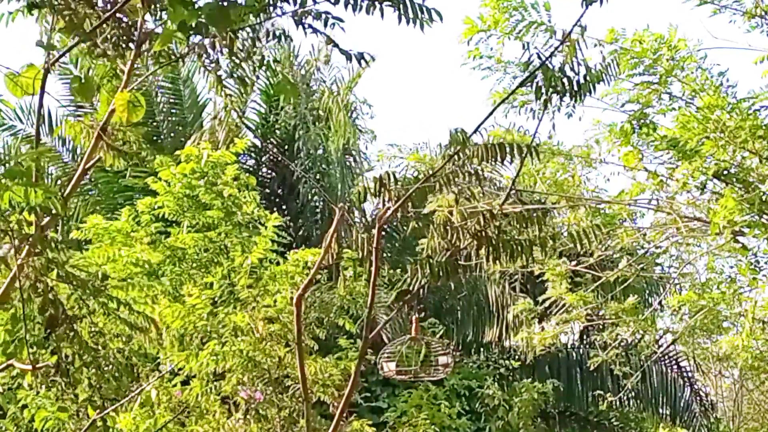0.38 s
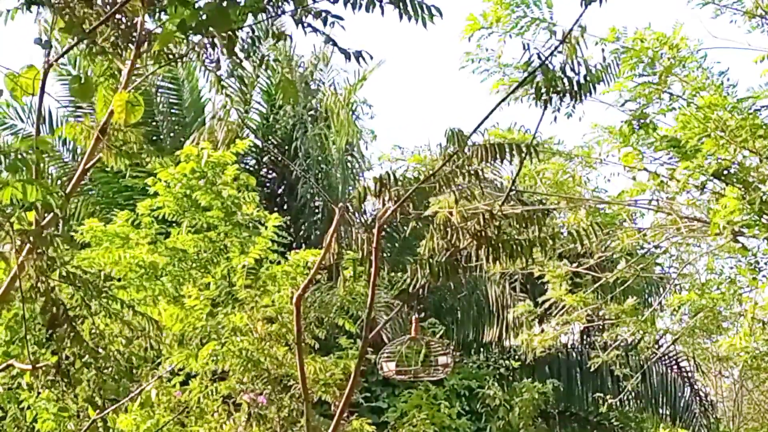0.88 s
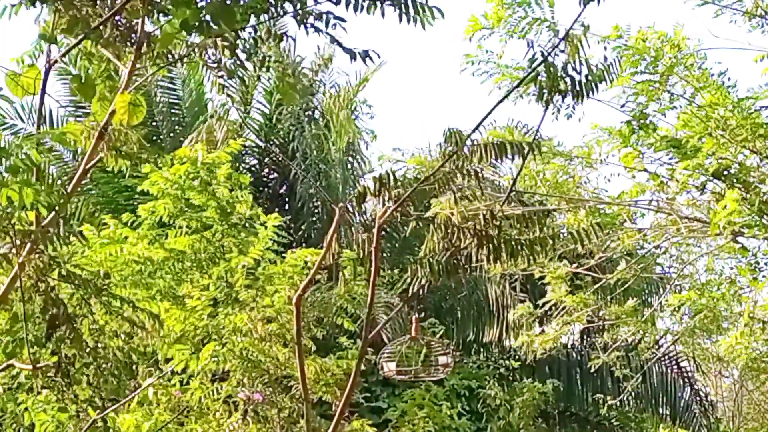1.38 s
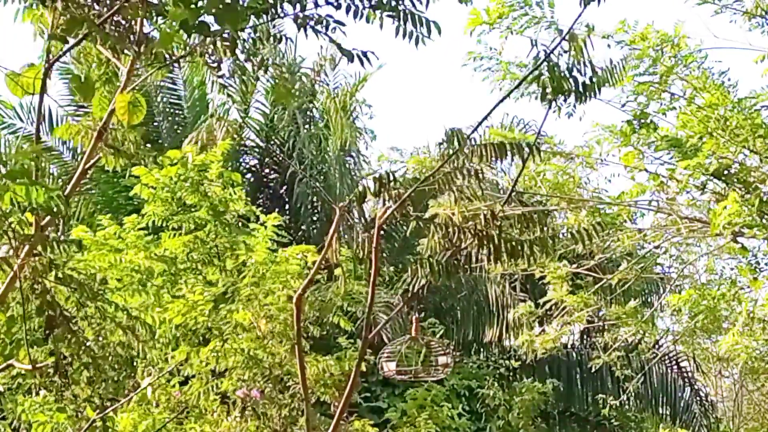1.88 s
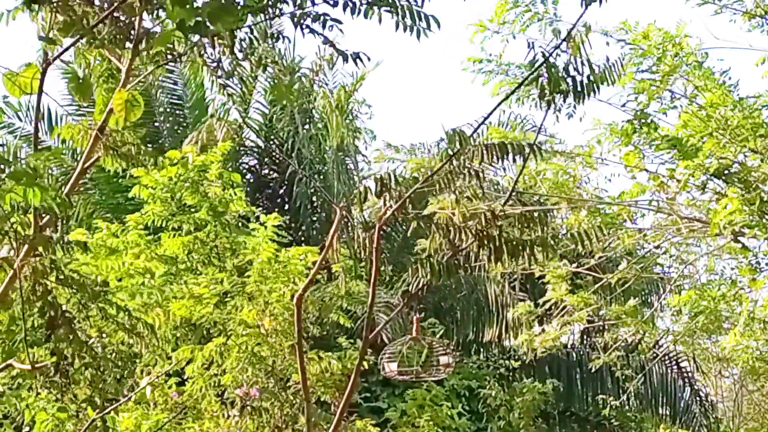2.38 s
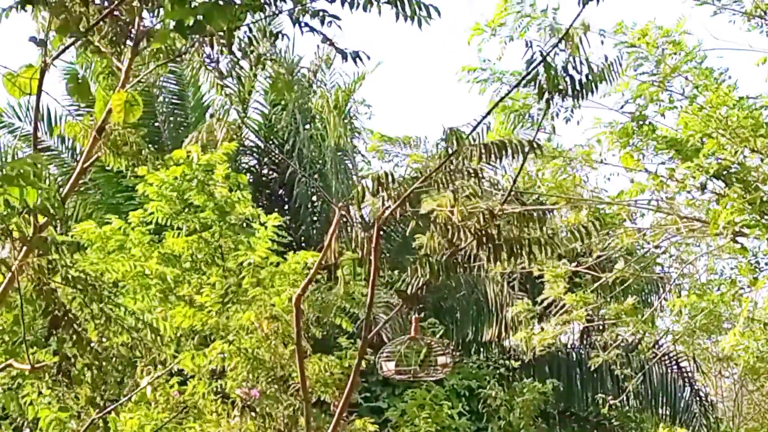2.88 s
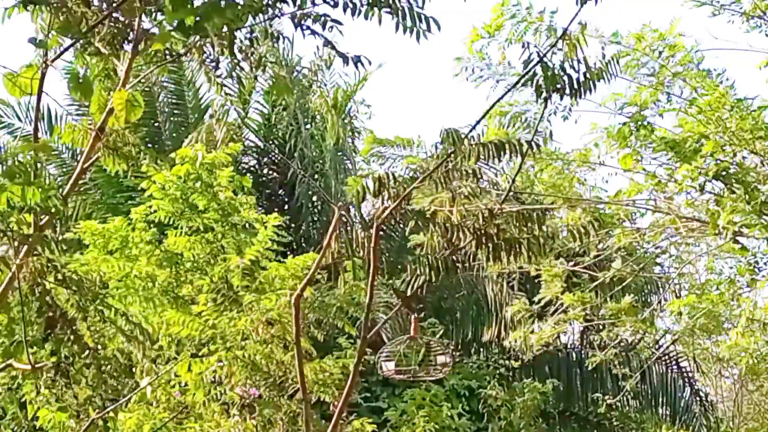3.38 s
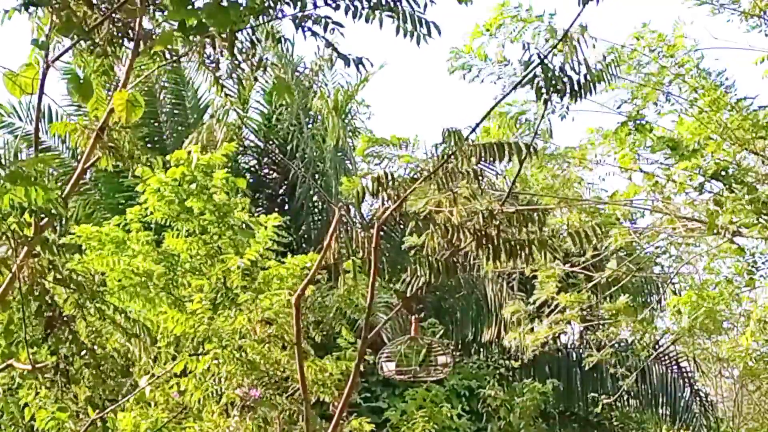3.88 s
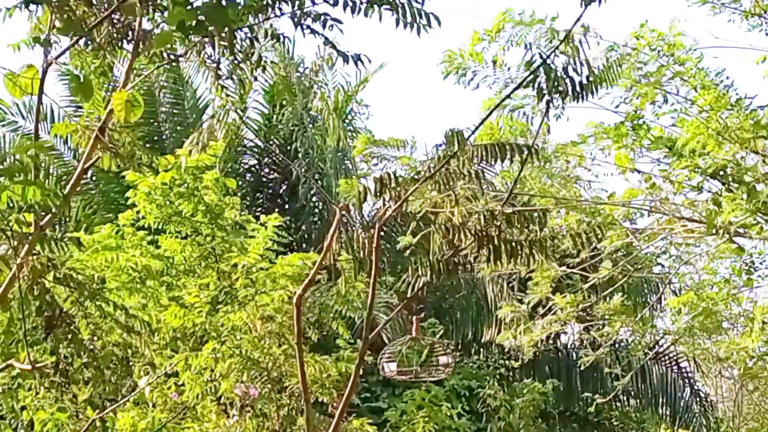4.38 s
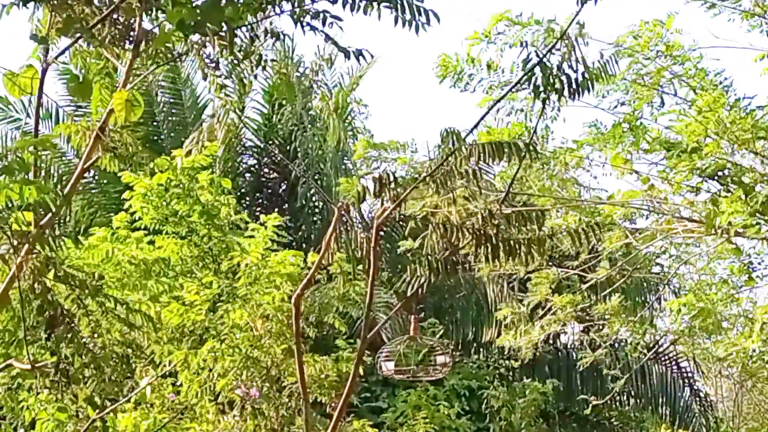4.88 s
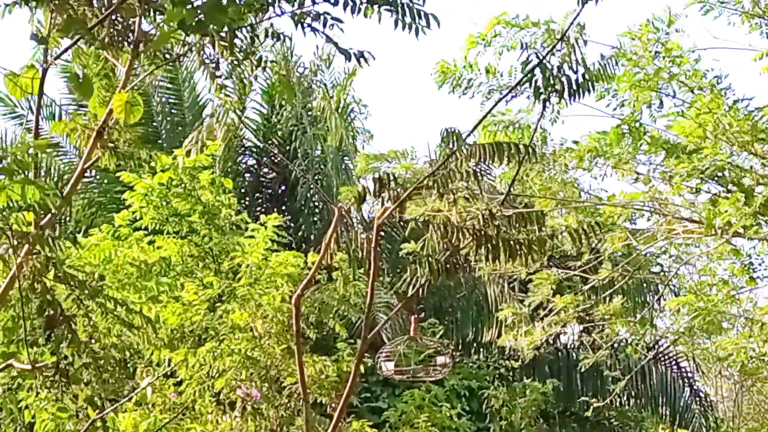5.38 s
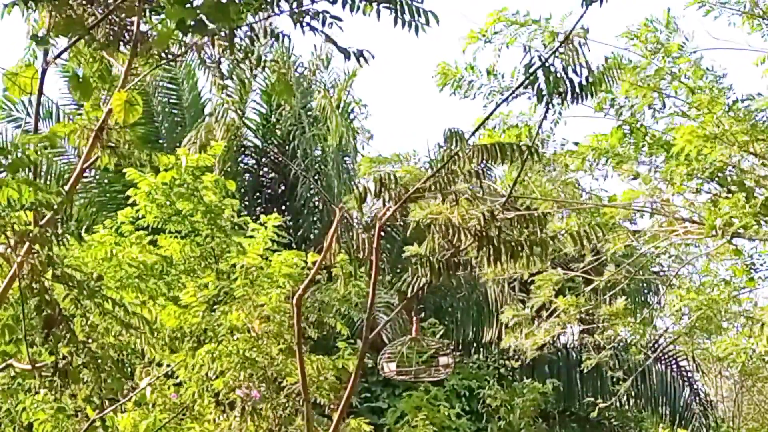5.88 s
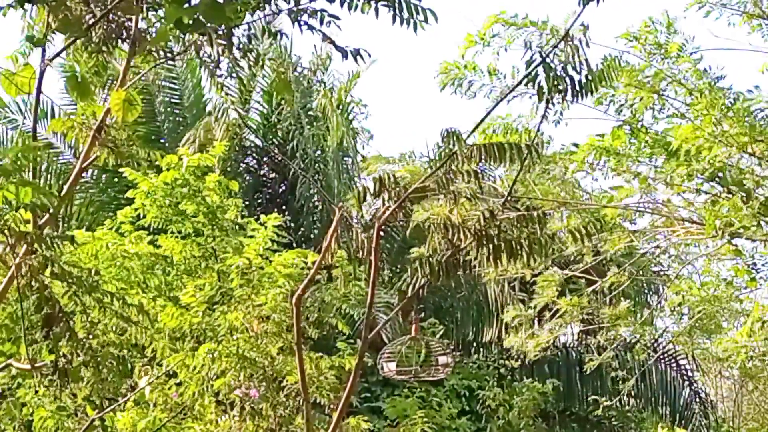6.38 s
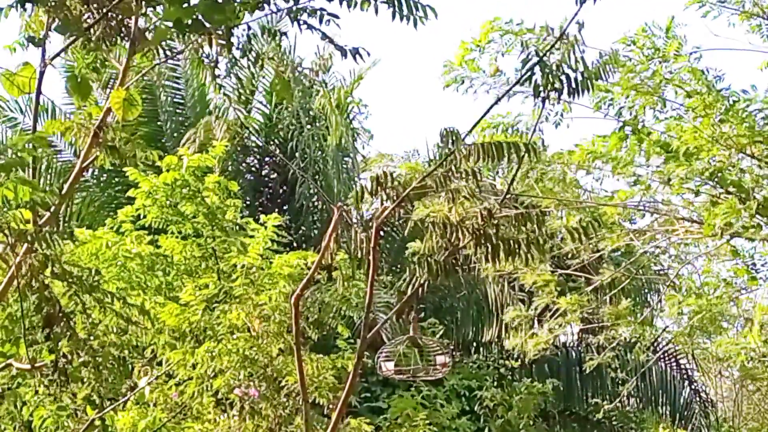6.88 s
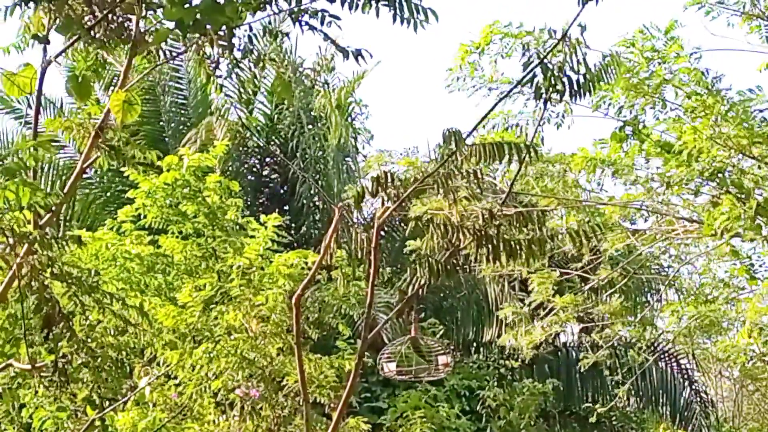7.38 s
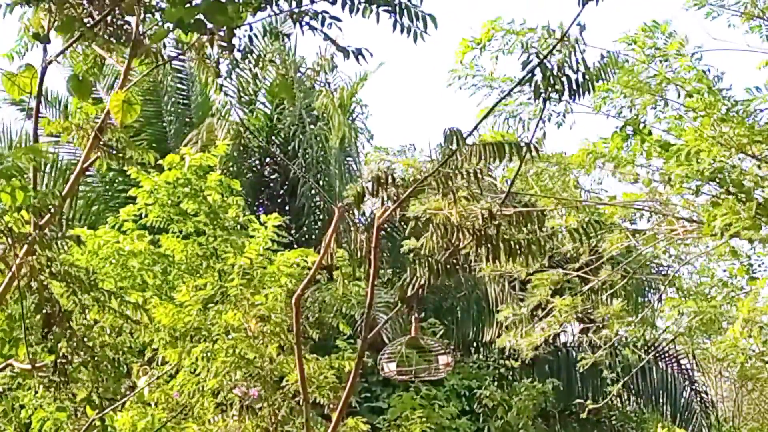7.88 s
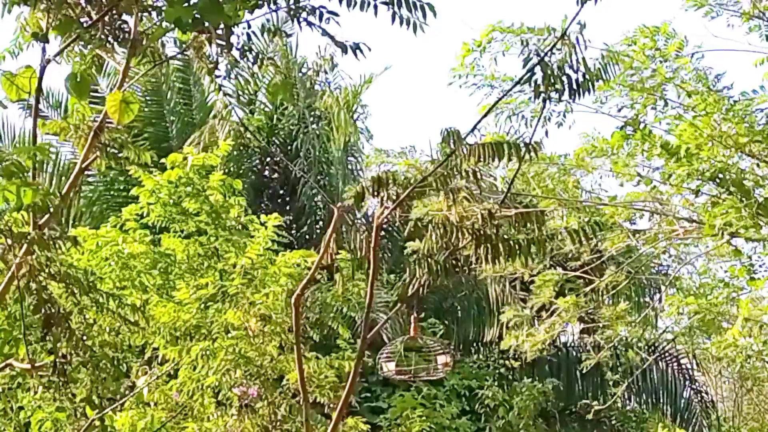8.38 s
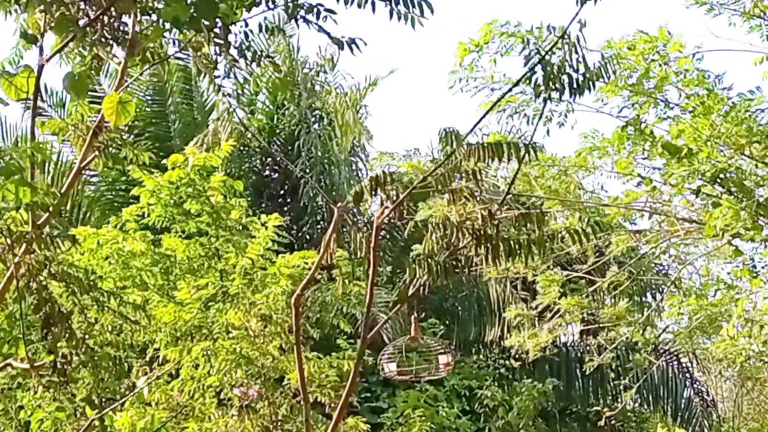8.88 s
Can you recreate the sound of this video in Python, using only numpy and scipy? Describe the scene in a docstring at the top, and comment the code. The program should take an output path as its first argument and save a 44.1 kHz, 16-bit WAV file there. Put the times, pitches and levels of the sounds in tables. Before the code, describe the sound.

A quiet outdoor place among leafy trees, heard through a small microphone with little deep bass. A far machine hums faintly and stops short near 0.95 s. A low, uneven drone continues, swelling near 1.9 and most at 5.6 s, under soft foliage hiss, small dry leaf rustles and thin pulsing insect buzz that grows towards 7.5 s. Wind puffs thump the microphone in short low bursts, notably at 4-4.7 s, 7.5-8 s and strongest about 9 s. Distant birds add faint brief pipes and coos. At 1.5 s a small parrot close by gives a piercing, rough-edged trill around 6.5 kHz, lasting about a quarter second, with a quick downward flick and short ringing echo. It repeats at 5.2 and 8.3 s. From 6.3 to 7.2 s come five evenly spaced, thinner twitter notes near 9 kHz.

```python
"""Among leafy trees a far machine, banded noise, hums and stops within the first second. Throughout, a
filtered-noise drone swells, wind puffs shake the microphone in short low cycles, leaves hiss and rustle,
insects buzz as pulsed treble noise and distant birds pipe gliding sines. Near 1.5, 5.2 and 8.3 s a small parrot
close by trills a sine with sidebands, then flicks fast downward, and the trees ring; from 6.3 to 7.2 s another
bird gives five higher two-voiced notes. Trunks and foliage smear the birds with decaying noise echoes."""
import sys
import numpy as np
from scipy import signal
from scipy.fft import rfft, irfft, next_fast_len
from scipy.io import wavfile
from scipy.ndimage import uniform_filter1d, map_coordinates

SR = 44100
rng = np.random.default_rng(int(sys.argv[2]) if len(sys.argv) > 2 else 0)


def master(y):
    """Save y as 16-bit WAV."""
    cut = np.clip(np.atleast_2d(y).T, -1, 1)
    pcm = np.round(cut * 32767)  # scale
    wavfile.write(sys.argv[1], SR, pcm.astype(np.int16))


def makeup_ratio(level_db):
    """Linear amplitude ratio for a level in decibels (20 dB per factor of ten)."""
    decades = np.asarray(level_db, float) / 20
    return 10 ** decades


N = 407925
T = np.arange(N) / SR


def unit(x):
    """Scale to rms 1."""
    return x / np.sqrt(np.mean(x ** 2) + 1e-20)


def along(points, hz):
    """Read (Hz, value) points on a log frequency axis."""
    f, v = np.transpose(points)
    return np.interp(np.log(hz + 1), np.log(f + 1), v)


def curve(points):
    """Read (s, value) points at every sample."""
    s, value = np.transpose(points)
    return np.interp(T, s, value)


def wobble(rate):
    """A smooth random curve, rate knots a second."""
    coarse = T[::8]
    knots = rng.standard_normal(int(N * rate / SR) + 4)
    return np.interp(T, coarse, map_coordinates(knots, [coarse * rate]))


def noise(gain, patchy_db):
    """Noise of rms 1 coloured by gain(Hz), with patches of random level."""
    hz, _, z = signal.stft(rng.standard_normal(N + 2048), SR, nperseg=2048)
    patches = unit(uniform_filter1d(rng.standard_normal(z.shape), size=15, axis=0))
    coloured = z * gain(hz)[:, None] * makeup_ratio(patchy_db * patches)
    return unit(signal.istft(coloured, SR, nperseg=2048)[1][:N])


def band(centre_hz, width_hz):
    """A bell-shaped band, down to 1/e at width_hz from its centre."""
    return lambda hz: np.exp(-((hz - centre_hz) / width_hz) ** 2)


def swell(t, s, width_ms, steep=2, lean=0):
    """A bump that, without lean, is half as high width / 2 from its centre; lean makes the rise faster."""
    u = 2e3 * (t - s) / width_ms
    return 2. ** -np.abs(u * (1 - lean * np.sign(u))) ** steep


def tone(hz):
    """Running phase of a pitch curve."""
    return 2 * np.pi * np.cumsum(hz) / SR


# colour of the far drone: pitch_hz, level_db (relative, per Hz)
DRONE_COLOUR = [(53, -33), (90, -5.5), (129, -10.5), (210, 2), (234, -3.5), (286, -14), (327, -7.5),
                (424, -25), (500, -50), (650, -62), (1100, -120)]
# swells of the drone: centre_s, rise_db (scaled separately for body and core), width_ms
DRONE_SWELLS = [(.95, 8.5, 300), (1.54, 5, 150), (1.889, 11, 130), (2.13, 6.5, 130), (3.09, 6.5, 360),
                (5.41, 10.5, 50), (5.588, 16.5, 134), (7.81, 5, 100), (8.32, 9, 100), (9.1, 9.5, 330)]


def drone():
    """Far, low noise whose narrow core near 211 Hz swells more than its broad body."""
    rise_db = sum(db * swell(T, s, width) for s, db, width in DRONE_SWELLS)
    body_db = -74 + 0.63 * rise_db + 2 * wobble(5.4)
    body = makeup_ratio(body_db) * noise(lambda hz: makeup_ratio(along(DRONE_COLOUR, hz)), patchy_db=2.5)
    core = makeup_ratio(-78 + 1.53 * rise_db) * noise(band(211, 30), patchy_db=1.5)
    return body + core


# low hums: pitch_hz, level_db, fade_start_s, fade_db_per_s
FADING_HUMS = [(103.3, -75, 1, 4), (156, -70, 0.32, 26)]


def hums():
    """Distant sine hums, unsteady in pitch and level, that fade away."""
    out = np.zeros(N)
    for hz, db, fade_s, fade_db in FADING_HUMS:
        level_db = db - fade_db * np.maximum(T - fade_s, 0) + 1.7 * wobble(4.5)
        out += makeup_ratio(level_db) * np.sin(tone(hz + 1.3 * wobble(1.4)))
    return out


# far machine: pitch_hz, width_hz (centre to 1/e), level_db (relative, per Hz)
MACHINE_LINES = [(157.6, 14.4, -3), (825, 33, -19.5), (1630, 55, -25), (2200, 230, -28.5),
                 (3000, 200, -30.5)]


def machine():
    """A distant machine: fuzzy hum lines of narrow-band noise that stop short."""
    off_s, fade_s = 0.95, 0.045
    lines = lambda f: sum(makeup_ratio(db) * band(hz, width)(f) for hz, width, db in MACHINE_LINES)
    return makeup_ratio(-73.5) * noise(lines, patchy_db=3.5) * np.clip((off_s - T) / fade_s, 0, 1)


# colour of the foliage hiss: pitch_hz, level_db (relative, per Hz)
LEAF_COLOUR = [(240, -13.5), (400, -1), (519, -3.5), (1300, -6.5), (1890, -9.5), (4460, -9), (6850, -11),
               (7510, -9), (8750, -11.5), (10700, -7), (13500, -20.5), (15000, -7.5), (15700, -6)]
# breeze in the foliage: time_s, level_db (before a small random wander)
BREEZE_LEVEL = [(0, -70), (1.2, -71.5), (2.6, -72.5), (5.6, -73), (8.1, -71.5), (9.25, -73)]


def breeze():
    """The breeze in the leaves all round: patchy coloured hiss."""
    hiss = noise(lambda hz: makeup_ratio(along(LEAF_COLOUR, hz)), patchy_db=3.0)
    return makeup_ratio(curve(BREEZE_LEVEL) + wobble(5)) * hiss


def cricket():
    """Wing noise near 9450 Hz, gated 16 times a second in strokes of 64, dropping to 0.3 just before 8 s."""
    chirp = tone(16.0 + .3 * wobble(4.7))
    gate = np.maximum(np.sin(chirp) + .4 + 0.32 * wobble(6.0), 0) * (1 + 0.38 * np.sin(4 * chirp))
    wing = noise(lambda hz: band(9450, 240)(hz) + 0.13 * band(12400, 350)(hz), patchy_db=-0.3)
    return makeup_ratio(-86.5 + 1.5 * wobble(3.9)) * unit(gate * wing) * np.clip((8 - T) / .3, .3, 1)


def thin_singers():
    """Thin steady insects: a high noise band, and two narrow bands ticking 29 times a second."""
    high = makeup_ratio(-86 + 1.7 * wobble(3.6)) * noise(band(15200, 690), patchy_db=1.0)
    ticking = 1 + 0.18 * np.sin(tone(29 + wobble(1.1)))
    pair = noise(lambda hz: band(8330, 80)(hz) + .7 * band(7650, 80)(hz), patchy_db=1.5)
    return high + makeup_ratio(-87) * ticking * pair


# insect effort: time_s, effort_db (scaled separately for the cicada and the low chorus)
EFFORT = [(0, -16.5), (2.3, -4), (4, -0.5), (5.8, 1), (7.5, 6), (8.2, 3.5), (8.6, 0.5), (9.25, -2.5)]


def cicada_chorus():
    """A cicada's 116 wing beats a second roughen a steady and a phrased band, over a low insect chorus."""
    effort_db = curve(EFFORT)
    phrase_s, peak_s = .728, 0.16
    singing = np.clip(.6 + .8 * np.cos(2 * np.pi * (T - peak_s) / phrase_s), 0, 1)
    buzz = 1 + 0.14 * np.sin(tone(116 + 4.5 * wobble(5.0)))
    steady = makeup_ratio(-82.5) * noise(band(10330, 600), patchy_db=0.5)
    phrased = makeup_ratio(-81.5) * singing * noise(band(10950, 330), patchy_db=0.5)
    low = makeup_ratio(-83.5 + 1.44 * effort_db + 1.5 * wobble(4)) * noise(band(8870, 1400), patchy_db=-2.0)
    return makeup_ratio(0.62 * effort_db) * buzz * (steady + phrased) + low


# colour of wind rumble at the microphone: pitch_hz, level_db (relative, per Hz)
RUMBLE_COLOUR = [(15, -45), (25, -8.5), (53, 0.5), (86, -2), (113, -3), (157, -5.5), (200, -24.5),
                 (260, -42), (440, -120)]
# gusts at the microphone: time_s, level_db (before a random wander)
GUST_LEVEL = [(0, -89), (.5, -73), (1.2, -76), (1.6, -82.5), (2.85, -77.5), (3.9, -79.5), (4.2, -68),
              (4.75, -67), (5, -80.5), (5.45, -67), (6.03, -69.5), (6.2, -79), (7.25, -78.5), (7.5, -65.5),
              (8.6, -69), (8.8, -88), (8.9, -51.5), (9.25, -60)]
# puffs on the microphone: centre_s, level_db (before a 3 dB lift), pitch_hz, width_ms (before x 0.66)
WIND_PUFFS = [(.489, -54.5, 81, 42), (1.015, -56.5, 75, 76), (1.864, -64.5, 65, 57), (2.86, -63, 69.5, 45),
              (3.04, -64.5, 70, 35), (4.026, -47, 75, 30), (4.131, -47.5, 74.5, 26), (4.195, -57, 70, 25),
              (4.481, -44.5, 80, 27), (4.628, -49.5, 92.6, 89), (4.695, -51, 99, 30), (4.844, -63, 75, 65),
              (5.189, -57.5, 70, 59), (5.741, -62, 83.4, 62), (5.842, -62, 101, 23), (5.529, -61, 95, 49),
              (5.97, -62, 79, 70), (6.308, -51.5, 87.5, 56), (7.408, -56, 76, 31), (7.574, -50, 86, 40),
              (7.761, -58, 83, 95), (7.888, -58.5, 87, 44), (8.014, -50, 93, 22), (8.369, -53.5, 77, 31),
              (8.438, -54, 93.5, 49), (8.6, -50.5, 114, 27), (8.854, -49.5, 105, 30),
              (8.924, -48.5, 101, 23), (8.983, -42.5, 96.5, 13), (9.121, -50, 95, 34), (9.187, -49, 76, 77)]


def wind():
    """Puffs push the diaphragm for a few low cycles, stirring broad rumble, over a lumpy rumble."""
    colour = lambda hz: makeup_ratio(along(RUMBLE_COLOUR, hz))
    out, stirred = np.zeros(N), noise(colour, patchy_db=0.0)
    for (s, db, hz, width), turn in zip(WIND_PUFFS, rng.random(len(WIND_PUFFS))):
        at = slice(round((s - .15) * SR), round((s + .15) * SR))
        push = np.sin(2 * np.pi * (hz * (T[at] - s) + turn)) + makeup_ratio(-8.5) * stirred[at]
        out[at] += makeup_ratio(db + 3.0) * swell(T[at], s, 0.66 * width) * push
    return out + makeup_ratio(curve(GUST_LEVEL) + 2.33 * wobble(10)) * noise(colour, patchy_db=1.0)


# leaf rustles and twig knocks: time_s (peak 7 ms later), level_db (before a 10 dB cut), ring_hz,
# broad_share (of the ring's gain), broad_centre_hz
LEAF_RUSTLES = [(0.28, -64, 1810, .62, 2500), (.839, -67, 1540, .55, 1500), (1.295, -63, 1330, .9, 1690),
                (2.081, -66, 2720, 0.98, 2580), (2.489, -66.5, 1240, 0.12, 1490),
                (2.658, -70, 1025, 0.15, 1200), (3.213, -68.5, 3060, .8, 3400),
                (3.302, -67, 1020, 0.14, 1200), (3.96, -65, 1970, 0.62, 2840), (4.166, -60, 5900, .8, 4100),
                (4.209, -62.5, 1175, 0.24, 1490), (4.222, -64.5, 3550, .95, 3800),
                (4.276, -63, 990, 0.27, 3700), (5.035, -66.5, 1420, 0.51, 1500),
                (5.151, -67.5, 4000, .95, 3000), (5.954, -72, 3700, 0.49, 3300),
                (6.169, -59, 1910, .45, 2300), (6.415, -65.5, 1260, 0.18, 2300),
                (6.698, -62.5, 1496, 0.3, 2200), (7.112, -59, 4430, .6, 6500),
                (7.407, -59, 1900, .83, 2200), (8.125, -67, 1470, .44, 1990),
                (8.185, -63, 1460, 0.48, 2200), (8.681, -73, 1290, 0.4, 1590)]


def rustles():
    """Each rustle is a grainy puff of noise: a hollow ring and its overtone over a broad band."""
    out, t = np.zeros(N), np.arange(4096) / SR
    f = np.fft.rfftfreq(4096, 1 / SR)
    bell = lambda centre_hz, octaves: np.exp(-(np.log2(f / centre_hz + 1e-9) / octaves) ** 2)
    draws = rng.standard_normal((len(LEAF_RUSTLES), 2, 4096))
    for (s, db, hz, broad, broad_hz), draw in zip(LEAF_RUSTLES, draws):
        grains = draw[0] * makeup_ratio(1.7 * np.repeat(draw[1, ::64], 64))  # a new random level every 64 samples
        colour = bell(hz, 0.066) + 0.27 * bell(1.62 * hz, 0.027) + broad * bell(broad_hz, .8)
        puff = unit(irfft(rfft(grains) * colour))
        out[round((s - .03) * SR):][:4096] += makeup_ratio(db - 10) * swell(t, 0.037, 28.2, lean=0.21) * puff
    return out


# distant birds: start_s, length_s, from_hz, to_hz, level_db (before flutter)
DISTANT_BIRDS = [(.186, 0.12, 2980, 2900, -72), (.474, 0.074, 4110, 4720, -62.5),
                 (.566, .051, 655, 610, -76), (0.602, 0.24, 1630, 1630, -71.5),
                 (0.196, .05, 3450, 3250, -79), (.849, 0.046, 653, 570, -68),
                 (1.994, 0.15, 4330, 4640, -73), (3.276, 0.22, 4510, 4680, -75),
                 (4.58, 0.092, 4120, 4660, -76), (5.733, .069, 2910, 2740, -74),
                 (5.74, 0.023, 1590, 1710, -72), (5.759, 0.043, 1906, 1970, -78),
                 (5.79, 0.24, 4480, 4440, -79), (6.505, .085, 632, 633, -72),
                 (6.63, 0.061, 1277, 1395, -77), (6.69, .085, 620, 610, -69.5),
                 (7.151, 0.048, 3330, 3250, -80), (7.74, .05, 4000, 3990, -78),
                 (8.24, 0.091, 3760, 3820, -78), (9.14, .085, 3254, 3290, -78)]


def far_birds():
    """Soft gliding whistles and coos; moving air makes the long ones flutter."""
    out, flutter, jitter = np.zeros(N), wobble(60), wobble(150)
    for s, length, from_hz, to_hz, db in DISTANT_BIRDS:
        u = np.linspace(0, 1, round(length * SR))
        at = slice(round(s * SR), round(s * SR) + len(u))
        hz = (from_hz + (to_hz - from_hz) * u) * (1 + 0.004 * jitter[at])
        depth_db = 22 / (1 + (0.11 / length) ** 4)  # notes beyond 0.11 s flutter most
        shape = np.sin(np.pi * u ** 0.59) ** 0.66
        out[at] += makeup_ratio(db - depth_db * np.abs(flutter[at])) * shape * np.sin(tone(hz))
    return out


# echo decay among the trees: pitch_hz, t60_s
TREE_DECAY = [(3400, 0.15), (3900, 0.13), (4400, 0.23), (5000, 0.19), (6500, 0.33), (9200, 0.32),
              (13000, 0.14)]


def grove(x, gap_ms, near_ms, far_db):
    """Decaying diffuse echoes, weaker after near_ms; moving air renews the tail each half second."""
    out, step = np.zeros(N + 2 * SR), SR // 2
    blend = np.sin(np.pi * np.arange(2 * step) / (2 * step)) ** 2
    for start in range(0, N, step):
        hz, t, z = signal.stft(rng.standard_normal(SR // 2), SR, nperseg=256)
        fade_db = -60 * t / along(TREE_DECAY, hz)[:, None]
        fade_db = fade_db + far_db / (1 + np.exp((near_ms - 1000 * t) / 4))  # far trunks answer more weakly
        tail = signal.istft(z * makeup_ratio(fade_db), SR, nperseg=256)[1]
        piece = x[start:start + 2 * step]
        wet = signal.fftconvolve(piece * blend[:len(piece)], tail / np.linalg.norm(tail))
        out[start + round(gap_ms * SR / 1000):][:len(wet)] += wet
    return out[:N]


# twitter notes of a second bird: start_s, peak_after_ms, top_pitch_hz, top_level_db, low_level_db (the levels
# before the breath's wander; the top one that of its sharp peak)
TWITTER_NOTES = [(6.266, 57, 9300, -45, -55.5), (6.468, 72, 9274, -44.5, -55),
                 (6.683, 72, 9210, -45.5, -46.5), (6.888, 68, 9200, -45, -49), (7.121, 56, 9280, -41, -63)]


def twitter():
    """Two thin voices: a low one opens and closes each note, a higher one climbs and swells between, with breath."""
    low_hz, open_ms, after_ms, close_ms = 8970, 33, 96, 21
    out, breath_db, jitter_hz = np.zeros(N), 3.35 * wobble(110), 45 * wobble(200)
    puff = noise(band(7800, 1100), patchy_db=-1)
    for s, peak_ms, hz, db, low_db in TWITTER_NOTES:
        ms, peak_s = 1000 * (T - s), s + peak_ms / 1e3
        onset = np.clip(ms / 3.2, 0, 1)
        low = swell(T, s + open_ms / 1600.0, open_ms) + makeup_ratio(-0.5) * swell(T, s + after_ms / 1e3, close_ms)
        # a sharp peak on a broad shoulder
        top = swell(T, peak_s, 23.3) + makeup_ratio(-5.5) * swell(T, peak_s, 92, lean=-.1)
        climb_hz = hz - 249.8 * np.exp(-np.abs(ms) / 25)
        low_voice = makeup_ratio(low_db) * low * np.sin(tone(low_hz + jitter_hz))
        top_voice = makeup_ratio(db) * top * np.sin(tone(climb_hz + jitter_hz))
        out += onset * (low_voice + top_voice)
        out += makeup_ratio(-74.5) * swell(T, s, 30, lean=0.31) * puff
    return out * makeup_ratio(breath_db)


# downward flick after each trill: start_s, from_hz, to_hz, length_ms, level_db (before the throat's gain)
CALL_FLICKS = [(1.681, 6030, 3500, 20, -61), (5.402, 6200, 3920, 12, -55.5), (8.489, 6500, 3490, 16, -52.5)]


def flicks():
    """The throat lets go: the pitch drops within 20 ms, loudest where the throat resonates."""
    out, shake = np.zeros(N), wobble(900)
    for s, from_hz, to_hz, ms, db in CALL_FLICKS:
        u = np.linspace(0, 1, round(ms * SR / 1000))
        hz = to_hz + (from_hz - to_hz) * (1 - u) ** 1.42
        phase = tone(hz + 140 * shake[round(s * SR):][:len(u)])
        throat = 0.44 + .6 * band(3550, 130)(hz) + 2.14 * band(4400, 170)(hz) + 3.0 * band(5700, 400)(hz)
        octave = makeup_ratio(-1) * band(5200, 450)(hz) * np.sin(2 * phase)
        shape = np.abs(np.sin(np.pi * u ** 0.63)) ** 0.54
        out[round(s * SR):][:len(u)] += makeup_ratio(db) * shape * (throat * np.sin(phase) + octave)
    return out


# swells of each near call: the trill, then after the flick its ringing echo from the trees; one list per call:
# centre_s, level_db (before a 2.5 dB lift), pitch_hz (before lift and jitter), width_ms (before x 0.86)
CALL_SWELLS = [
    [(1.53, -40, 6345, 30.7), (1.556, -33.5, 6510, 11), (1.593, -35, 6680, 23), (1.623, -37, 6490, 16),
     (1.644, -35.5, 6531, 20.6), (1.672, -31.5, 6595, 10), (1.689, -38.5, 6574, 21),
     (1.722, -33.5, 6557, 26), (1.742, -37, 6540, 8.5), (1.756, -47.5, 6559, 17)],
    [(5.23, -44.5, 5975, 25), (5.26, -38.5, 6540, 40), (5.302, -29.5, 6506, 23.6), (5.333, -35, 6556, 34),
     (5.353, -35, 6640, 17.5), (5.388, -39.5, 6500, 26), (5.408, -39.5, 6450, 17),
     (5.445, -34.5, 6473, 24.6)],
    [(8.339, -39.5, 6390, 20), (8.36, -40, 6365, 19), (8.401, -30, 6605, 31), (8.43, -46, 6470, 27.5),
     (8.45, -31, 6555, 10.6), (8.488, -31.5, 6610, 21.4), (8.531, -34.5, 6510, 7.7),
     (8.543, -34, 6500, 6.5), (8.572, -45, 6480, 7.7)],
]


def whistles():
    """A trilled sine; a second membrane some 460 Hz away adds sidebands, the beak an octave, breath a rough skirt."""
    out = np.zeros(N)
    breath = noise(lambda hz: band(0, 400)(hz) + .2 * band(0, 900)(hz), patchy_db=1.5)
    jitter_hz, beat_hz = 35 * wobble(300), 460 + 45 * wobble(120)
    side_start_db, side_awake_db, side_wake_s = -59.5, -46.5, 0.051
    for call, (flick_s, *_) in zip(CALL_SWELLS, CALL_FLICKS):
        s, db, hz, width = np.transpose(call)
        above_mean_db = db - db.mean()
        # the second membrane wakes during the call
        side_db = side_awake_db + (side_start_db - side_awake_db) * np.exp((s[0] - s) / side_wake_s)
        # the octave fades 3 dB a second, grows less than the level, and is weaker in the echo after the flick
        octave_db = -24 - 3 * (s - s[0]) - .15 * above_mean_db
        octave_db += -9 * (s > flick_s + .025)
        at = slice(round((s[0] - .05) * SR), round((s[-1] + .05) * SR))
        t = T[at]
        shapes = swell(t, s[:, None], 0.86 * width[:, None], steep=4.0, lean=0.29)
        bumps = shapes * makeup_ratio(db + 2.5)[:, None]
        level = bumps.sum(0)
        # the pitch rises through each swell
        rise = np.tanh(3000.0 * (t - s[:, None]) / width[:, None])
        lift_hz = 60 * np.sum(rise * bumps, 0) / (level + 1e-9)
        phase = tone(np.interp(t, s, hz) + lift_hz + jitter_hz[at])
        beat = tone(beat_hz[at])
        sides = np.sin(phase + beat) + makeup_ratio(-3) * np.sin(phase - .9 * beat)
        sides += makeup_ratio(-1.5) * breath[at] * np.sin(phase - 0.34 * beat)
        rough = np.sin(2 * phase + .8 * beat) + .6 * np.sin(2 * phase - .6 * beat)
        octave = np.sin(2 * phase) + makeup_ratio(-12) * breath[at] * rough
        side_level = makeup_ratio(side_db + 0.51 * above_mean_db) @ shapes
        out[at] += level * np.sin(phase) + side_level * sides + makeup_ratio(octave_db) @ bumps * octave
    return out


def scene():
    """The near bird, the echoes of all the birds, and everything around them."""
    call, flick, notes, far = whistles(), flicks(), twitter(), far_birds()
    sent = makeup_ratio(-4.5) * call + makeup_ratio(2.5) * flick + makeup_ratio(-0.5) * notes + makeup_ratio(-4) * far
    birds = call + flick + notes + far + grove(sent, gap_ms=6, near_ms=39, far_db=-1.5)
    insects = cricket() + thin_singers() + cicada_chorus()
    air = drone() + hums() + machine() + breeze() + wind()
    return (birds + insects + air + rustles())[None]


def band_limit(x):
    """A steep low-pass at the top of the band."""
    return signal.sosfilt(signal.butter(12, 15840, fs=SR, output="sos"), x)


def record(dry):
    """A small microphone loses the bass below 50 Hz and everything above 15820 Hz."""
    size = next_fast_len(N)
    hz = np.fft.rfftfreq(size, 1 / SR)
    response = (hz < 15820) / np.sqrt(1 + (50 / (hz + 1)) ** 6)
    heard = irfft(rfft(dry, size) * response, size)[:, :N]
    return band_limit(heard)


dry = scene()
out = record(dry)
master(out)
```